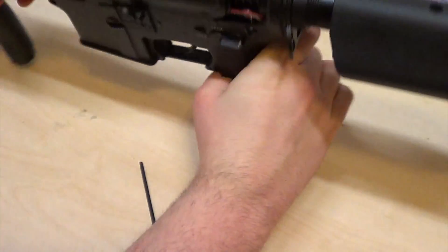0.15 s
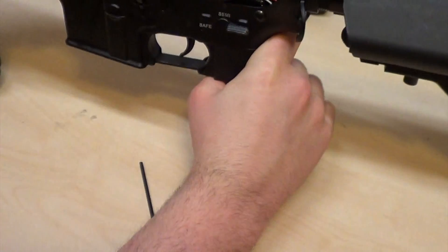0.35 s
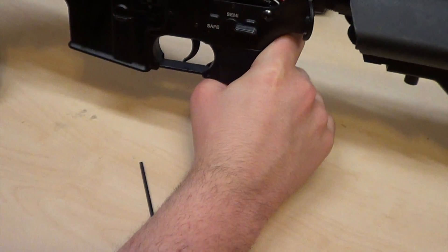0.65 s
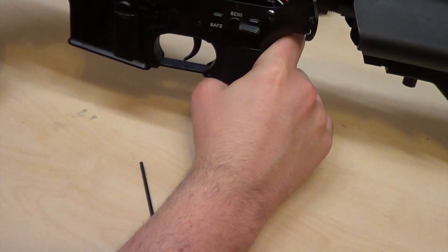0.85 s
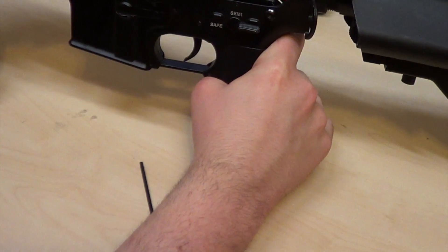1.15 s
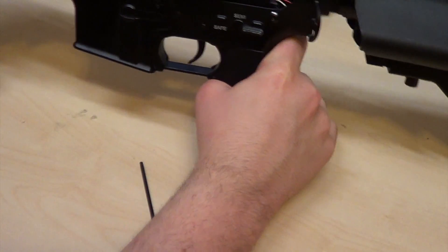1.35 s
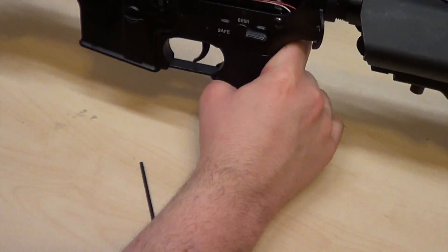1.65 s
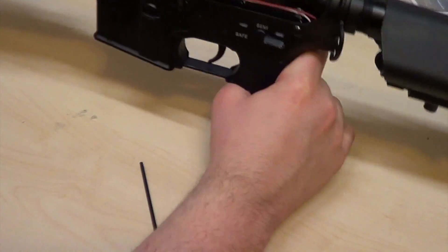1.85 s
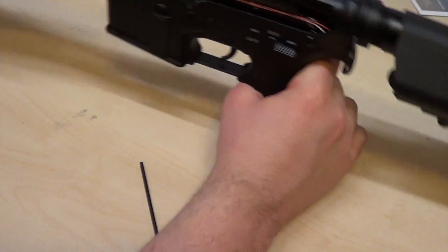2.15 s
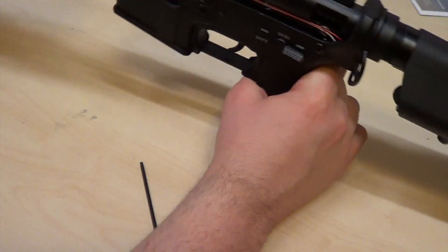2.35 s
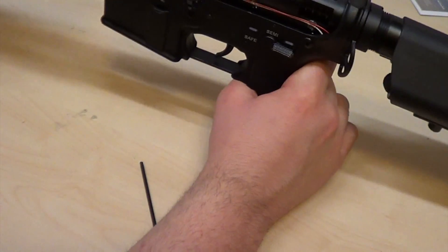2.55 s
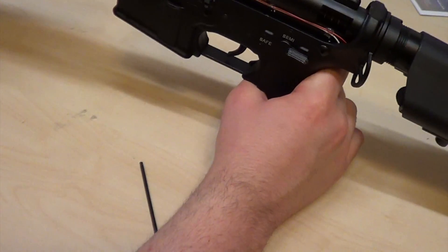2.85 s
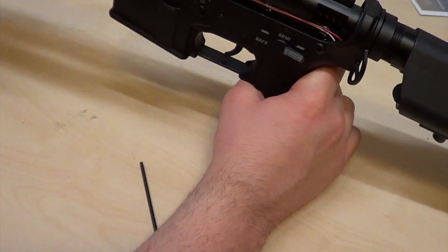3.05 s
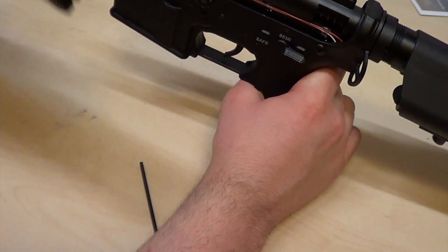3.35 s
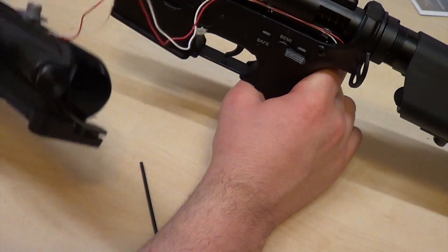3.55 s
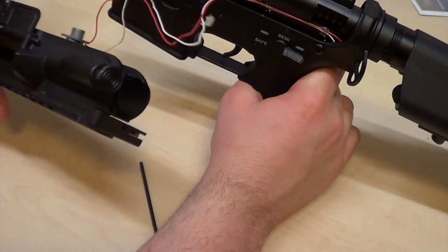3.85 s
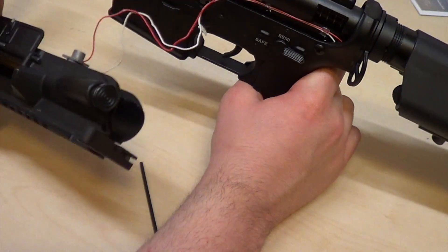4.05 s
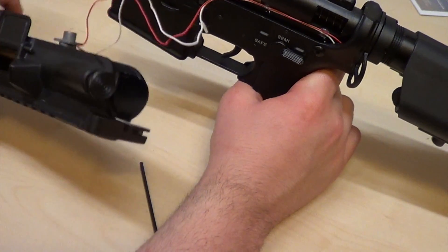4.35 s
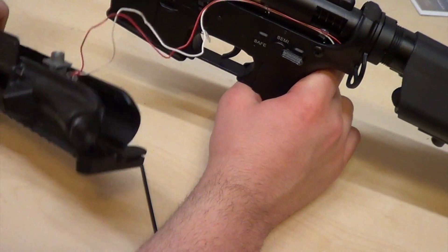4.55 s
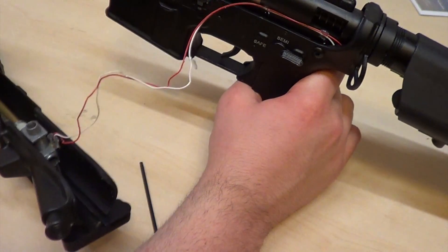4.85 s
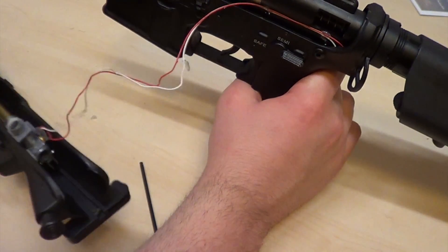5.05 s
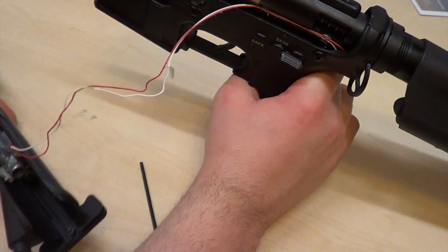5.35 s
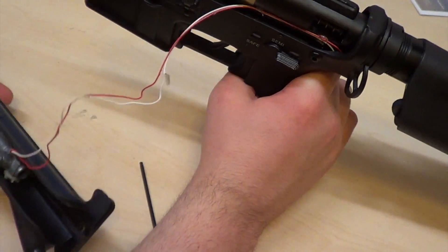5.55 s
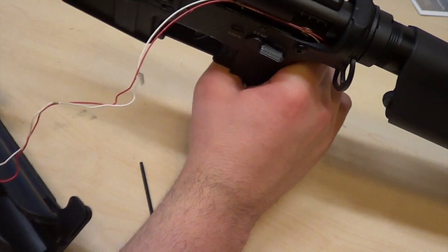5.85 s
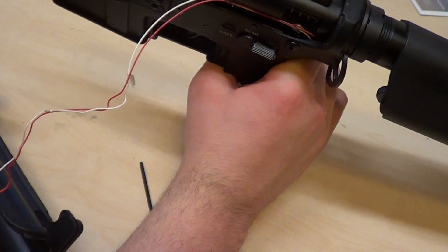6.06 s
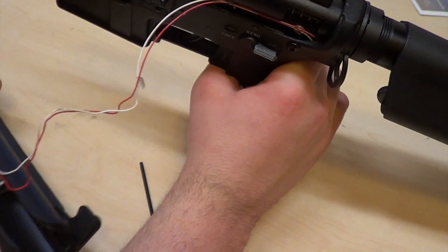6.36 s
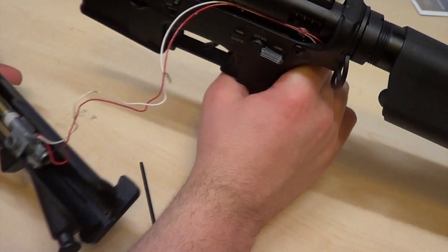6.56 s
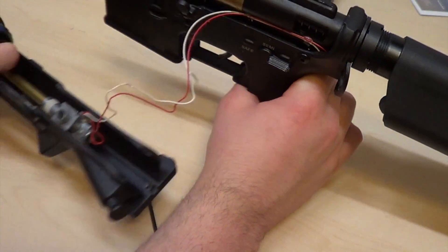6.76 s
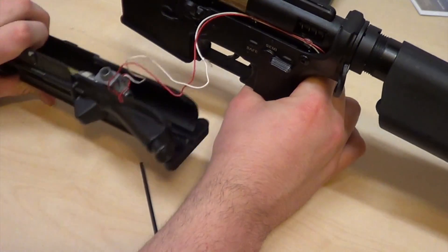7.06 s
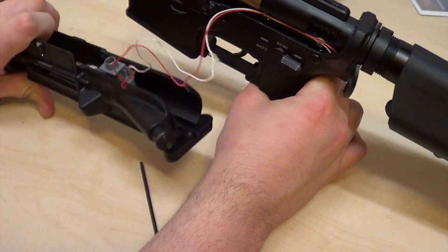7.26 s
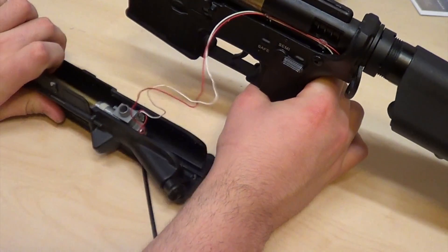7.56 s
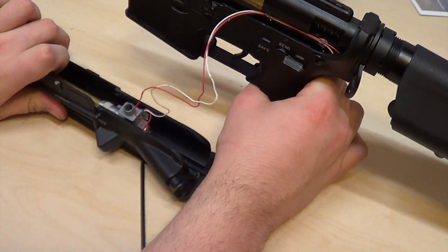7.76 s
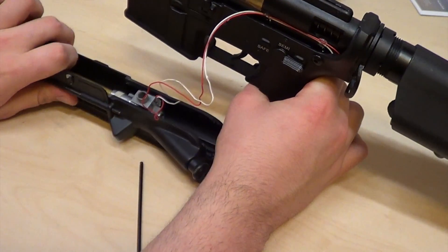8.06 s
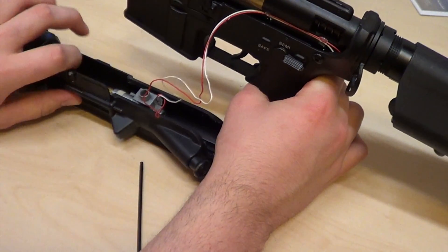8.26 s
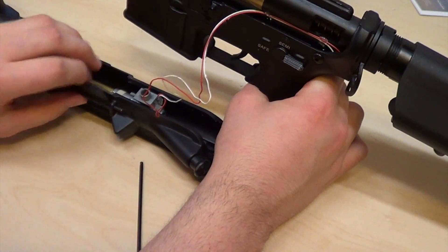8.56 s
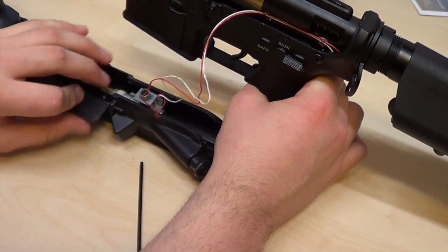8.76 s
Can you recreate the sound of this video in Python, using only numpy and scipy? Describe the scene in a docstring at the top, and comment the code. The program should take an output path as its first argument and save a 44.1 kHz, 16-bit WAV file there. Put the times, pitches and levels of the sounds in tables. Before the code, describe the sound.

A quiet small room with soft airy noise, low mains hum and a very faint high whistle, heard close to a wooden table. Faint metal scrapes and ticks open the scene. Near 1.35 seconds quick clicks build to a loud bright snap at 1.44, a thin spring singing after it. A firm clack at 1.9 leads into short scrapes and clicks, then a solid plastic knock and table thud at 2.3, and a duller bump at 2.85. Around 3.9 to 4.1 come crisp metal clicks and a loud hollow clack; a duller hollow double knock follows at 4.8. Only tiny ticks remain from 5 to 6.7. From 6.8 light bumps grow into a hard hollow clatter at 7.25 and the heaviest table thuds at 7.4 to 7.7. A small steel pin tinkles at 7.9, then light taps and clicks fade by 8.8.

```python
"""An airsoft rifle is pulled apart over a wooden table in a small room, heard from close by.
Metal scrapes and clicks, a spring and a pin ring, the loose plastic half is knocked and laid on the table.
Each contact drives five parts (table, shell cavity, shell wall, receiver, small steel) with shaped noise
bursts and room tails; decaying sines add the clear rings. Air noise, mains hum and a thin whistle lie
below; a fast limiter flattens the loud blows."""
import sys
import numpy as np
from scipy import signal
from scipy.fft import rfft, irfft, next_fast_len
from scipy.io import wavfile
from scipy.ndimage import uniform_filter1d

SR = 44100
rng = np.random.default_rng(int(sys.argv[2]) if len(sys.argv) > 2 else 0)


def dump(signal):
    """Clip the signal to [-1, 1] and save it as 16-bit WAV at the path in sys.argv[1]."""
    limited = np.clip(np.atleast_2d(signal).T, -1, 1)
    pcm = np.round(limited * 32767).astype(np.int16)
    wavfile.write(sys.argv[1], SR, pcm)


N = 392490
SIZE = 32768  # samples per event, 0.74 s
HZ = np.fft.rfftfreq(SIZE, 1 / SR)
AGE_S = np.arange(SIZE) / SR
SHAKEN_HZ = 9200  # centre of the steel's treble when plastic or table shakes it

# knocks on the hollow plastic shell: start_s, level_db, hardness_db, hollow_ring_db
KNOCKS = [(2.324, -15.5, 1, -49), (2.35, -17.5, -0.5, -44), (2.843, -23.5, -4.5, -50),
          (4.028, -19.5, 12.5, -19), (4.046, -11.5, 2.5, -31), (4.088, -23, 7.5, -20),
          (4.384, -34.5, -27, -38.5), (4.522, -61, 16, -54), (4.808, -15, -12, -25),
          (4.846, -25, -9.5, -17.5), (4.89, -20.5, -39, -24), (4.912, -45, -23, -33),
          (7.243, -13.5, 7, -31), (7.265, -13.5, 1, -27), (7.293, -10.5, -7, -20.5),
          (7.456, -17.5, -1, -52), (7.552, -23, 24, -35), (7.562, -13, 18, -20), (7.595, -15.5, 13.5, -37)]
# gun bumps the table: start_s, level_db, hardness_db, tabletop_ring_db
THUDS = [(0.002, -33, 0.5, -50), (2.331, -13.5, 1, -21.5), (2.843, -16, -11, -27), (3.367, -30, -8, -28),
         (4.046, -28, 0, -34), (6.824, -34, -1, -48), (6.964, -34, 2, -41), (6.979, -22.5, 2, -10.5),
         (7.265, -30, -5, -23), (7.382, -17, -3, -31), (7.479, -24, 15, -24.5), (7.562, -7.5, -6, -18),
         (7.595, -15, -11, -20), (7.692, -17.5, 11, -18.5), (7.793, -28, 19.5, -25), (7.862, -22, 3, -38),
         (7.868, -26, 13, -41), (7.99, -36, 4, -31), (8.078, -42, 17.5, -34), (8.097, -42.5, -15, -30),
         (8.312, -41, -5, -33.5)]
# plastic shell rubs along: middle_s, half_length_s, level_db, hardness_db, hollow_ring_db
RUBS = [(4.372, 0.036, -49.5, -8, -39), (4.52, 0.02, -55.5, 5, -42.5), (5.111, 0.034, -53.5, 0, -47),
        (7.632, 0.02, -33.5, 5, -38), (7.979, 0.017, -40.5, 17.5, -55), (8.154, 0.06, -55, -6, -66),
        (8.287, 0.011, -40.5, -20, -54)]
# modes of the hollow plastic half, two air modes first: pitch_hz, relative_level_db, t60_s
HOLLOW_MODES = [(464, 0, 0.13), (531.5, -1, 0.19), (651, -13, 0.25), (1130, -3.5, 0.2), (1210, -0.5, 0.08),
                (1318, -11, 0.12)]


def amp(db):
    """Decibels to gain."""
    return 10 ** (np.asarray(db) / 20)


def norm(x):
    """Scale to an energy of 1."""
    return x / np.sqrt(np.sum(x ** 2) + 1e-20)


def decay(t60_s):
    """Exponential envelope that falls 60 dB in t60_s."""
    return np.exp(-np.log(1000) * AGE_S / t60_s)


def along(points, hz):
    """Read (Hz, value) points on a log frequency axis."""
    f, v = np.transpose(points)
    return np.interp(np.log(hz + 1), np.log(f + 1), v)


def causal(points):
    """Minimum-phase response of a dB spectrum: it rings only after the blow."""
    cepstrum = irfft(np.log(amp(along(points, HZ))))
    cepstrum[1:SIZE // 2] *= 2
    cepstrum[SIZE // 2 + 1:] = 0
    return np.exp(rfft(cepstrum))


def filtered(x, gain):
    """Apply a gain that depends on frequency."""
    m = next_fast_len(N + SR // 2)
    spectrum = rfft(x, m) * gain(np.fft.rfftfreq(m, 1 / SR))
    return irfft(spectrum, m)[..., :N]


def add(track, start_s, sound):
    """Mix a sound into a track at start_s, or at 0 if that is negative."""
    start = max(round(start_s * SR), 0)
    piece = track[..., start:start + sound.shape[-1]]
    piece += sound[..., :piece.shape[-1]]


def background(air_db=-53):
    """Mid and side of the quiet room: shaped air noise, mains hum and a thin electronic whistle."""
    # air spectrum: pitch_hz, relative_db_per_hz
    air_spectrum = [(15, -81), (25, -44), (41, -6), (64, -45), (87, -4), (108, -12), (145, -6), (242, -5.5),
                    (317, -10.5), (354, -10.5), (503, -13.5), (1610, -21), (8360, -26.5), (14800, -28),
                    (16000, -92)]
    # air width: pitch_hz, side_minus_mid_db
    air_width = [(60, -18), (110, -11), (200, -10), (380, -1), (700, 2.5), (1290, 3), (2380, -0.5),
                 (4400, -3.5), (8120, -2.5), (15000, -76)]
    # hum and whistle: pitch_hz, level_db_rms
    hum = [(60, -54), (120, -56.5), (180, -64), (240, -62), (15734, -61.5)]
    mid, side = filtered(rng.standard_normal((2, N)), lambda hz: amp(along(air_spectrum, hz)))
    side = filtered(side, lambda hz: amp(along(air_width, hz)))
    out = amp(air_db) * np.array([mid, side]) / mid.std()
    t = np.arange(N) / SR
    for hz, db in hum:
        out[0] += amp(db) * np.sqrt(2) * np.sin(2 * np.pi * (hz * t + rng.random()))
    return out


def room(build_s=0.0021):
    """Mid and side spectra of a fresh noise tail whose decay time depends on frequency."""
    # decay: pitch_hz, t60_s
    room_decay = [(150, 0.39), (600, 0.29), (1500, 0.26), (4000, 0.29), (9000, 0.22), (15000, 0.15)]
    hz, t, z = signal.stft(rng.standard_normal((2, SIZE // 2)), SR, nperseg=256)
    fade = amp(-60 * t / along(room_decay, hz)[:, None])
    tail = signal.istft(z * fade, SR, nperseg=256)[1]
    build = 1 - np.exp(-AGE_S[:tail.shape[1]] / build_s)
    return rfft(tail * build, SIZE)


def widened(side):
    """Narrow or widen the room sound by frequency through its side signal."""
    # room width: pitch_hz, side_minus_mid_db
    room_width = [(100, 8), (300, -1), (1000, -5.5), (5000, -6), (7500, -9), (12000, -34)]
    return filtered(side, lambda hz: amp(along(room_width, hz)))


def part_bodies():
    """Minimum-phase spectra of the five parts."""
    # radiation of each part: pitch_hz, relative_db_per_hz
    table_body = [(25, -48), (50, -22), (90, -16), (135, -11), (174, 1.5), (222, -4), (312, 6), (385, 6),
                  (460, -1.5), (900, -81.5)]
    cavity_body = [(150, -58), (320, -19), (400, -8), (470, -4), (533, -2.5), (585, -1.5), (645, -1),
                   (730, -4.5), (880, -8.5), (990, -10.5), (1110, -7.5), (1190, -15), (1280, -9.5),
                   (1450, -22), (2500, -65)]
    wall_body = [(350, -69), (740, -13), (900, -11), (1110, -9.5), (1290, -13), (1420, -3), (1570, 0),
                 (1900, -5), (2250, -10.5), (2800, -10), (6000, -59.5)]
    receiver_body = [(900, -75), (1950, -4), (2350, -3.5), (2750, -5), (3200, 3), (3950, 3.5), (4400, 1),
                     (4850, -1), (5200, -10), (5800, 0.5), (6300, -19), (6700, -12), (12000, -52)]
    steel_body = [(3000, -97), (6300, -36), (6800, -5), (7400, 3), (8400, 2.5), (9800, 2.5), (10800, -1.5),
                  (11600, 0.5), (13000, -6), (15000, -1), (16000, -33)]
    return [causal(p) for p in (table_body, cavity_body, wall_body, receiver_body, steel_body)]


def excite(force, levels_db, steel_hz, bodies, bite_s=0.00017, steel_octaves=0.4, gun_t60_s=0.024,
           spread_per_db=0.15, firm_db=-28):
    """Mid and side sound of a force on the five parts; a level is near energy averaged over 10 ms."""
    # per part: ring t60_s
    part_t60_s = [0.16, 0.13, 0.03, 0.061, 0.029]
    # per part: room level relative to near sound, db, for firm blows
    part_wet_db = [-8, -3.5, -1, -1.5, -4.5]
    out, walls, push = np.zeros((2, SIZE)), room(), rfft(force, SIZE)
    # the small part touched sets the treble's centre
    focus = np.exp(-.5 * (np.log2((HZ + 1) / steel_hz) / steel_octaves) ** 2)
    focused = bodies[:-1] + [bodies[-1] * focus]
    # a light contact stays local; a hard one fills the room
    spread_db = spread_per_db * min(max(levels_db) - firm_db, 0)
    for body, db, t60_s, wet_db in zip(focused, levels_db, part_t60_s, part_wet_db):
        # dense ring, new at each point of contact
        ring = rng.standard_normal(SIZE) * (1 - np.exp(-AGE_S / bite_s)) * decay(t60_s)
        near = irfft(push * rfft(ring) * body)
        # close-set modes of the whole gun colour the room sound
        gun_modes = rfft(rng.standard_normal(SIZE) * decay(gun_t60_s))
        far = irfft(push * body * gun_modes * walls)
        out[0] += amp(db) * norm(near)
        out += amp(db + wet_db + spread_db) * np.sqrt(2) * norm(far)
    return out * np.sqrt(SR / 100)


def ringing(hits, modes, vary_db=3.1, rise_s=0.0026):
    """A few clear modes sing on after each hit as decaying sines, at new strengths each time."""
    out = np.zeros(N)
    for start_s, *_, ring_db in hits:
        for hz, mode_db, t60_s in modes:
            gain = amp(ring_db + mode_db + vary_db * rng.standard_normal())
            fade = (1 - np.exp(-AGE_S / rise_s)) * decay(t60_s)
            add(out, start_s, gain * fade * np.sin(2 * np.pi * hz * AGE_S))
    return out


def stroke(half_s, catches_per_s=1800, scatter_db=4):
    """Force of a slide, and time to its middle: random catches under a swell and fade."""
    lead_s = 3 * half_s
    strength = amp(scatter_db * rng.standard_normal(SIZE))
    catches = (rng.random(SIZE) < catches_per_s / SR) * strength * rng.choice([-1, 1], SIZE)
    return catches * np.exp(-((AGE_S - lead_s) / half_s / 2) ** 2), lead_s


def on_table(db, hardness_db):
    """Levels of the five parts when the gun meets the table; hardness favours small, bright parts."""
    # per part: share_db
    table_share_db = [1, -3.5, -15.5, -19.5, -21]
    # per part: gain_db per hardness_db
    table_tilt = [0.017, 0.035, 0.6, 1, 1.0]
    return db + np.array(table_share_db) + hardness_db * np.array(table_tilt)


def on_shell(db, hardness_db):
    """Levels of the five parts when the plastic shell is touched; hardness favours bright parts."""
    # per part: share_db
    shell_share_db = [-14, 0.5, -5.5, -7.5, -12.5]
    # per part: gain_db per hardness_db
    shell_tilt = [0.05, 0.1, 0.25, 0.7, 1.0]
    return db + np.array(shell_share_db) + hardness_db * np.array(shell_tilt)


def on_metal(db, hardness_db):
    """Levels of the five parts when metal meets metal; hardness favours receiver and steel."""
    # per part: share_db
    metal_share_db = [-37, -27.5, -5, 2, 2.1]
    # per part: gain_db per hardness_db
    metal_tilt = [-1.1, -1.25, -0.47, 0.26, 0.91]
    return db + np.array(metal_share_db) + hardness_db * np.array(metal_tilt)


def tabletop_ring():
    """Board modes sound after each thud."""
    # modes: pitch_hz, relative_level_db, t60_s
    tabletop_modes = [(87.3, -14.5, 0.42), (149, -9.5, 0.244), (174.9, -4, 0.23), (269, -9, 0.14)]
    return ringing(THUDS, tabletop_modes)


def rubbed_hollow(count=2):
    """A rub is too soft for upper modes: it drives only the air modes of the hollow half."""
    out, air = np.zeros(N), np.zeros(SIZE)
    for hz, db, t60_s in HOLLOW_MODES[:count]:
        air += amp(db) * decay(t60_s) * np.sin(2 * np.pi * hz * AGE_S)
    for middle_s, half_s, *_, ring_db in RUBS:
        force, lead_s = stroke(half_s)
        length_gain = np.sqrt(SR * half_s * np.sqrt(2 * np.pi))
        add(out, middle_s - lead_s, amp(ring_db) * length_gain * norm(signal.fftconvolve(force, air)))
    return out


def spring_ring():
    """The plucked spring sings in a few high modes."""
    # plucks: start_s, level_db
    spring_hits = [(1.423, -27.5), (4.028, -58.5)]
    # modes: pitch_hz, relative_level_db, t60_s
    spring_modes = [(7262, -8, .6), (7391, -7, .7), (8215, 0, 0.9), (8280, -5, 0.9)]
    return ringing(spring_hits, spring_modes)


def pin_ring():
    """A struck loose steel pin sings in a few high modes."""
    # strikes: start_s, level_db
    pin_hits = [(7.884, -20), (7.96, -30)]
    # modes: pitch_hz, relative_level_db, t60_s
    pin_modes = [(8245, -3, .2), (8725, -6, .16), (12147, 0, .26), (12850, -16, .22)]
    return ringing(pin_hits, pin_modes)


def slides(bodies, scrape_hz=9670):
    """Metal scrapes and plastic rubs drive the five parts with trains of catches."""
    # metal on metal: middle_s, half_length_s, level_db, hardness_db
    scrapes = [(0.146, 0.037, -60.5, 3.5), (0.254, 0.016, -56, 5), (0.969, 0.0076, -49.5, -12),
               (1.343, 0.0098, -45, -7), (1.704, 0.017, -42, -3), (1.857, 0.009, -26.5, -5.5),
               (1.916, 0.0096, -42, 23), (2.162, 0.0093, -36, 3), (2.182, 0.01, -30.5, 6),
               (2.254, 0.009, -28, -7), (3.915, 0.0064, -28.5, -10), (4.377, 0.041, -63, 11),
               (5.445, 0.016, -56.5, 2), (6.842, 0.005, -40, 0), (7.941, 0.012, -28, 0.5),
               (8.733, 0.009, -61.5, 11), (8.831, 0.014, -62, 10)]
    out = np.zeros((2, N))
    for strokes, levels in ((scrapes, on_metal), (RUBS, on_shell)):
        for middle_s, half_s, db, hardness_db, *_ in strokes:
            force, lead_s = stroke(half_s)
            # hold the level over the stroke's length instead of 10 ms
            length_gain = np.sqrt(100 * half_s * np.sqrt(2 * np.pi))
            sound = excite(force, levels(db, hardness_db), scrape_hz, bodies)
            add(out, middle_s - lead_s, length_gain * sound)
    return out


def contacts(bodies):
    """Single impulses drive the five parts: metal clicks, shell knocks and table thuds."""
    # metal on metal: start_s, level_db, hardness_db, steel_pitch_hz
    clicks = [(0.398, -49, 2.5, 9100), (0.973, -42, -3, 10000), (1.002, -45.5, 4.5, 9500),
              (1.349, -43, 11.5, 8550), (1.371, -34.5, 3, 11300), (1.383, -41, 0, 9500),
              (1.407, -33, -3, 9600), (1.413, -24.5, -1.5, 9500), (1.425, -18.5, 4.5, 9500),
              (1.44, -7, 4.5, 9200), (1.684, -52, 8, 9000), (1.707, -30, -10.5, 9300),
              (1.733, -50.5, 19.5, 10200), (1.88, -15, -4, 10000), (1.983, -42, -8, 9300),
              (2.235, -26, 0.5, 9300), (2.241, -26.5, -7, 9400), (2.278, -24, -1, 9100),
              (2.305, -24, -5, 9150), (3.296, -52, 0, 9550), (3.399, -48.5, -0.5, 8800),
              (3.424, -48, -5, 9800), (3.891, -36, 1, 10600), (3.898, -23.5, 15, 11000),
              (3.933, -27, 17, 10700), (4.384, -47, 2, 9900), (5.137, -65, 11.5, 10500),
              (5.492, -51, 11, 10000), (5.508, -48, 2, 9700), (5.56, -57, 10, 9500),
              (6.792, -60.5, 12, 9800), (6.823, -33, -4, 8300), (6.982, -41.5, -30, 9400),
              (7.04, -61.5, 13, 10500), (7.784, -28.5, 9, 8460), (7.884, -35, 17, 8900),
              (7.9, -33, -5, 9200), (7.911, -39, 17, 9300), (7.963, -42.5, 21.5, 8500),
              (8.307, -40, 19, 10200), (8.314, -34, 7, 10400), (8.523, -55.5, -0.5, 9450)]
    out = np.zeros((2, N))
    for start_s, db, hardness_db, steel_hz in clicks:
        add(out, start_s, excite([1], on_metal(db, hardness_db), steel_hz, bodies))
    for blows, levels in ((KNOCKS, on_shell), (THUDS, on_table)):
        for start_s, db, hardness_db, _ in blows:
            add(out, start_s, excite([1], levels(db, hardness_db), SHAKEN_HZ, bodies))
    return out


def scene():
    """Left and right: the gun is straight ahead, only its room sound and the air are wide."""
    bodies = part_bodies()
    mid, side = contacts(bodies) + slides(bodies)
    mid = mid + spring_ring() + pin_ring()
    mid = mid + tabletop_ring() + ringing(KNOCKS, HOLLOW_MODES) + rubbed_hollow()
    mid, side = np.array([mid, widened(side)]) + background()
    return np.array([mid + side, mid - side])


def record(dry, ceiling_db=-14.5, release_db_per_s=800, top_hz=16200):
    """A limiter ducks just ahead of loud blows and recovers quickly; then a band limit."""
    power = np.abs(uniform_filter1d(np.mean(dry ** 2, axis=0), size=88))  # 2 ms
    over_db = np.maximum(10 * np.log10(power + 1e-12) - ceiling_db, 0)
    # instant attack, linear release in dB
    recovery_db = release_db_per_s * np.arange(N) / SR
    duck_db = np.maximum.accumulate(over_db + recovery_db) - recovery_db
    limited = dry * amp(-uniform_filter1d(duck_db, size=66))  # 1.5 ms
    return filtered(limited, lambda hz: hz < top_hz)


dry = scene()
out = record(dry)
dump(out)
```